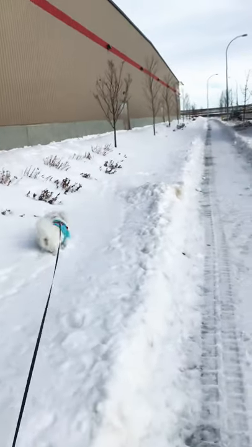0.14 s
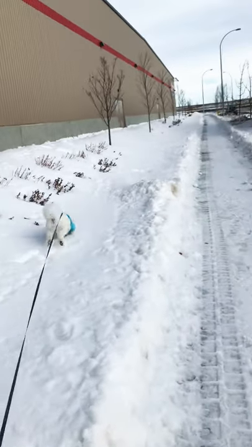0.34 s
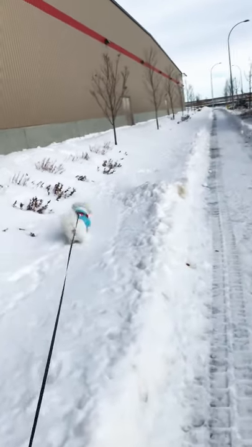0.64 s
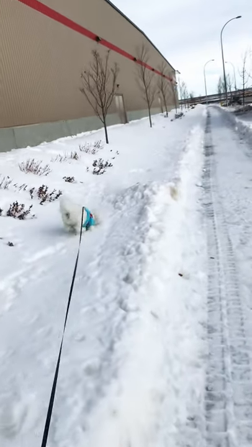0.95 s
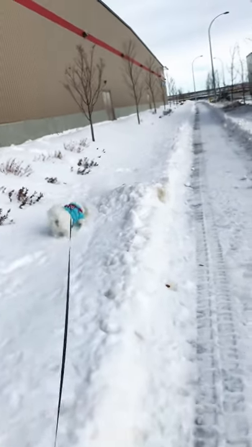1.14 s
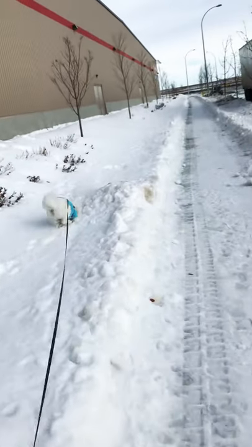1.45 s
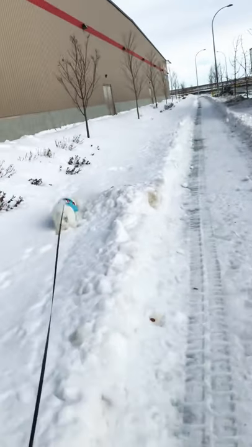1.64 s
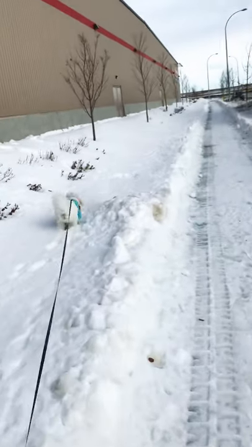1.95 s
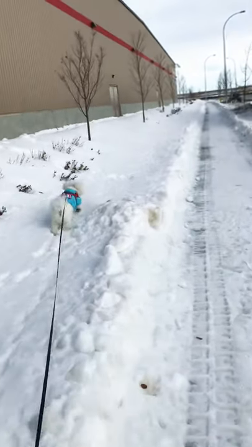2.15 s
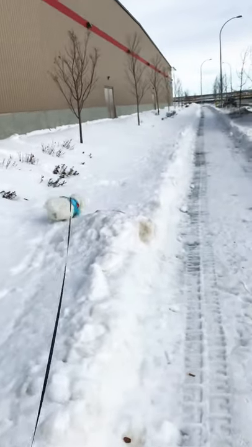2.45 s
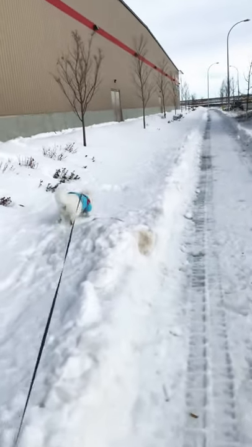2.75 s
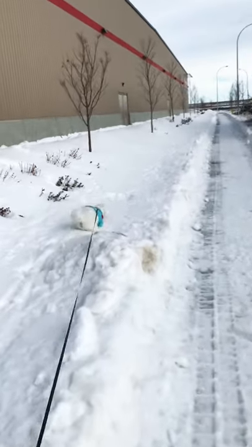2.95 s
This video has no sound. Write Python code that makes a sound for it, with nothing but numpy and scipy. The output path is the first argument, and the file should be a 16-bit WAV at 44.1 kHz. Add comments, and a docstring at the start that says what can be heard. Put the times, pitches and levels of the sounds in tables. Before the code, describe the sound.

Boots crunch softly through crusted snow at about two steps a second, with small icy snaps. Wind thumps and rumbles on the hand-held microphone throughout, over a faint hiss of clothing and a distant town hum.

```python
"""Wind thumps and rumbles on the microphone as boots crunch through crusted snow, two steps a second.
Outdoors, on a phone in the walker's hand. About a metre below it, each boot crushes a swarm of ice
grains and snaps bits of crust. Winter clothing hisses at arm's length, and a town hums far off."""
import sys
import numpy as np
from scipy import signal
from scipy.fft import rfft, irfft
from scipy.io import wavfile
from scipy.ndimage import uniform_filter1d

SR = 44100
rng = np.random.default_rng(int(sys.argv[2]) if len(sys.argv) > 2 else 0)


def unload_wav(signal):
    """Save mono or channel-first audio to the path in sys.argv[1] as 16-bit WAV at rate SR, clipped to [-1, 1]."""
    wavfile.write(
        sys.argv[1],
        SR,
        np.round(np.clip(np.atleast_2d(signal).T, -1, 1) * 32767).astype(np.int16),
    )


N = 136710
TIME_S = np.arange(N) / SR


def undb(db):
    """Decibels to gain."""
    return 10 ** (np.asarray(db) / 20)


def unit(x):
    """Scale to rms 1."""
    return x / np.sqrt(np.mean(x ** 2) + 1e-20)


def colour(x, points, tilt_db=0):
    """Causal filter through (freq_hz, gain_db) points, tilted by tilt_db per octave about 1.5 kHz."""
    hz, db = np.array(points).T
    octave = np.log2(np.maximum(np.fft.rfftfreq(2 * N, 1 / SR), 1))
    gain = undb(np.interp(octave, np.log2(hz), db) + tilt_db * (octave - np.log2(1500)))
    cepstrum = irfft(np.log(gain))[:N]
    cepstrum[1:] *= 2  # minimum phase: nothing rings ahead of a click
    return irfft(rfft(x, 2 * N) * np.exp(rfft(cepstrum, 2 * N)))[:N]


def band_noise(hz):
    """Noise two octaves wide around a centre, rms 1."""
    band = signal.butter(2, [hz / 2, min(hz * 2, SR / 2 - 100)], "band", fs=SR, output="sos")
    return unit(signal.sosfilt(band, rng.standard_normal(N)))


def wander(per_s):
    """Glide between random values, rms 1."""
    hold = int(SR / per_s)
    stairs = np.repeat(rng.standard_normal(N // 100), hold)[:N]
    return unit(uniform_filter1d(stairs, hold))


def clicks(per_s, spread_db):
    """Random clicks of uneven size, rms 1."""
    hits = (rng.random(N) < per_s / SR) * np.sign(rng.standard_normal(N))
    return unit(hits * undb(spread_db * np.minimum(rng.exponential(size=N), 4)))


def fade(age, decay_s):
    """Sudden start and exponential decay."""
    return (age >= 0) * np.exp(-np.abs(age) / decay_s)


def bell(centre_s, half_length_s):
    """A rounded rise and fall, peak 1."""
    return np.exp(-((TIME_S - centre_s) / half_length_s) ** 2)


def swells(rows):
    """Bells of gain from (centre_s, half_length_s, level_db) rows, added in power."""
    return np.sqrt(sum((undb(db) * bell(at, half)) ** 2 for at, half, db in rows))


# Spectrum of the town, far off: freq_hz, gain_db
TOWN_SPECTRUM = [(40, 8), (100, 4), (380, -6), (1100, -6), (1800, -12), (3200, -19.5), (5000, -30),
                 (15500, -54.5)]
def town_hum():
    """The distant town: a low, wavering wash of noise."""
    return unit(colour(rng.standard_normal(N), TOWN_SPECTRUM)) * undb(-51 + wander(14))


# Spectrum of the fabric hiss, at arm's length: freq_hz, gain_db
HISS_SPECTRUM = [(1200, -2.5), (3200, 7.5), (4800, 1.5), (9200, -0.5), (10400, -3.5), (11500, 2.5),
                 (15500, 6)]
# Rise and fall of that hiss: time_s, level_db
HISS_LEVELS = [(0, -53.5), (.22, -54), (.27, -57.5), (.52, -56), (.59, -51.5), (.74, -63.5), (.83, -53.5),
               (.98, -59.5), (1.07, -54), (1.42, -62.5), (1.95, -63.5), (2.02, -57), (2.18, -60),
               (2.42, -55), (2.57, -67), (2.73, -59.5), (3.1, -65)]
# Swishes of fabric: centre_s, half_length_s, level_db
SWISHES = [(1.28, 0.065, -58), (1.57, 0.033, -50), (1.81, 0.043, -60)]
def clothing():
    """Fabric hisses as the walker moves and now and then brushes with a lower swish."""
    hiss = unit(colour(rng.standard_normal(N), HISS_SPECTRUM))
    hiss_db = np.interp(TIME_S, *np.array(HISS_LEVELS).T) + 1.9 * wander(33.42)
    brush = unit(signal.lfilter(*signal.iirpeak(2980, Q=2.5, fs=SR), clicks(6000, spread_db=3)))
    return hiss * undb(hiss_db) + brush * swells(SWISHES)


# Puffs of wind, right on the microphone: centre_s, half_length_s, level_db
GUSTS = [(.255, 0.038, -27.5), (.475, 0.035, -24.5), (.56, 0.091, -29), (.74, 0.034, -37.5),
         (.83, 0.041, -30), (.94, 0.068, -33.5), (1.155, 0.059, -30), (1.39, 0.1, -31.5),
         (1.54, 0.043, -32), (1.69, 0.028, -33), (1.84, 0.11, -40.5), (2.24, 0.017, -30.5),
         (2.36, 0.26, -43), (2.58, 0.033, -30), (2.715, 0.1, -29.5)]
# Spectrum of their rumble: freq_hz, gain_db
RUMBLE_SPECTRUM = [(20, -34.5), (35, 0), (64, 4), (100, -3), (170, -12), (260, -29.5), (1500, -65)]
# Spectrum of the small eddies in strong gusts: freq_hz, gain_db
FLUTTER_SPECTRUM = [(80, -13.5), (200, 10), (420, -13), (700, -15), (2500, -96.5)]
def wind(breeze_db=-49.5, gustiness_db=3.5, flutter_db=-44.5):
    """Separate puffs rumble over a faint breeze; the strong ones add quicker, uneven flutter."""
    force = np.hypot(swells(GUSTS), undb(breeze_db + gustiness_db * wander(8.7)))
    rumble = unit(colour(rng.standard_normal(N), RUMBLE_SPECTRUM))
    rumble /= np.sqrt(uniform_filter1d(rumble ** 2, SR // 36))  # evened out, so force sets its level
    flutter = colour(rng.standard_normal(N), FLUTTER_SPECTRUM) * undb(2 * wander(50))
    return force * rumble + undb(flutter_db) * unit(flutter * force ** 1.5)


def swing(cycles, rise_cycles=0.36, fall_cycles=0.42):
    """One rounded push and pull of pressure that dies more slowly than it builds."""
    width = np.where(cycles < 0, rise_cycles, fall_cycles)
    return np.sin(2 * np.pi * cycles) / np.cosh(np.minimum(np.abs(cycles) / width, 20))


# Eddies that strike the microphone: centre_s, level_db, pitch_hz
EDDIES = [(.228, -16.5, 154.5), (0.249, -14.5, 307), (0.343, -15, 89), (0.433, -12, 234),
          (0.57, -21.5, 306), (0.78, -28.5, 237), (0.915, -23.5, 151), (1.111, -18.5, 99),
          (1.137, -18.5, 347), (1.196, -22, 104), (1.378, -16.5, 219), (1.393, -15.5, 190),
          (1.415, -14.5, 180), (1.464, -19.5, 128), (2.308, -18, 130.3), (2.3659, -19.5, 199),
          (2.704, -19.5, 129)]
def wind_thumps(puff_db=-10.5, puff_ratio=2.44, swirl_db=-13, swirl_cycles=2.6):
    """Each eddy is a swing of pressure with a quicker puff at its core and a little swirl around it."""
    out = np.zeros(N)
    for at, db, hz in EDDIES:
        near = np.abs(TIME_S - at) < 0.1
        cycles = (TIME_S[near] - at) * hz
        puff = undb(puff_db) * swing(puff_ratio * cycles)
        swirl = signal.sosfilt(signal.butter(4, 2 * hz, fs=SR, output="sos"), band_noise(hz))[near]
        swirl *= undb(swirl_db) * np.exp(-np.abs(cycles) / swirl_cycles)
        out[near] += undb(db) * (swing(cycles) + puff + swirl)
    return out


def snow_creak(pitch_hz=1100, level_db=-34):
    """Under the heaviest step, packed snow sticks and slips in jerks that ring one hollow resonance."""
    ring = signal.iirpeak(pitch_hz, Q=2, fs=SR)
    jerks = clicks(500, spread_db=1)
    creak = unit(signal.lfilter(*ring, signal.lfilter(*ring, jerks)))
    return undb(level_db) * creak * bell(centre_s=1.044, half_length_s=0.017)


def ice_grains(per_s_at_1khz):
    """Ice grains of many sizes, each ringing briefly at its own pitch; small ones are more numerous."""
    out = 0
    for hz in np.geomspace(300, 14000, 16):
        breaks = clicks(per_s_at_1khz * np.sqrt(hz / 1000), spread_db=4)
        out = out + signal.lfilter(*signal.iirpeak(hz, Q=4.5, fs=SR), breaks)
    return unit(out)


# Spectrum of breaking snow, heard from hand height: freq_hz, gain_db
CRUNCH_SPECTRUM = [(120, -23.5), (300, -2.5), (700, -1), (1150, -1.5), (1700, -9.5), (2400, -11.5),
                   (3400, -11.5), (4900, -17), (6000, -17.5), (10000, -29), (15500, -30)]
def crunch(grains, tilt_db=0):
    """Give grains the tone of snow underfoot, rms 1."""
    return unit(colour(grains, CRUNCH_SPECTRUM, tilt_db))


def pop(cycles, peak_cycles=0.66):
    """A dead pop of a cycle or two."""
    swell = np.maximum(cycles, 0) / peak_cycles
    return np.sin(2 * np.pi * cycles) * (swell * np.exp(1 - swell)) ** 3


# Snaps of crust and ticks of ice at the walker's feet: start_s, level_db, pitch_hz
SNAPS = [(0.08, -30, 3060), (.304, -28.5, 1850), (0.3434, -25.5, 2000), (.965, -28.5, 2555),
         (1.0113, -30, 1130), (1.034, -27, 1170), (1.074, -20.5, 1180), (1.332, -28, 1040),
         (1.529, -38.5, 5640), (1.5656, -26.5, 2900), (1.572, -26.5, 750), (1.639, -31, 760),
         (1.7291, -35.5, 11880), (2.071, -27.5, 1263), (2.107, -18.5, 760), (2.146, -25, 1180),
         (2.1646, -28.5, 1370), (2.183, -34, 1250), (2.2052, -21.5, 1160), (2.2907, -27, 1150),
         (2.512, -34, 3600), (2.7031, -22.5, 930), (2.7191, -30, 3400), (2.7997, -34, 1150),
         (2.8382, -31, 1360), (2.8659, -33, 2430), (2.8913, -28.5, 1160), (2.9273, -30.5, 1400)]
def crust_snaps(recrack_s=0.0034, recrack_ratio=0.77):
    """Crust gives way: a pop with a rough edge, a weaker, lower second crack and a brief shatter."""
    out, age = np.zeros(2 * N), np.arange(SR // 20) / SR
    shards = crunch(ice_grains(300), tilt_db=-3)
    delays = recrack_s * (0.5 + rng.random(len(SNAPS)))
    for (start, db, hz), delay in zip(SNAPS, delays):
        span = int(start * SR) + np.arange(len(age))
        recrack = undb(-7.5) * pop((age - delay) * hz * recrack_ratio)
        edge = undb(-13.5) * band_noise(2 * hz)[span] * fade(age, decay_s=0.00089)
        shatter = undb(-9) * shards[span] * fade(age, decay_s=0.0037)
        onset = np.minimum(age * hz, 1)
        out[span] += undb(db) * (pop(age * hz) + recrack + onset * (edge + shatter))
    return out[:N]


# Boot presses, scrapes and brief collapses of snow, about a metre below the microphone:
# start_s, length_s, level_db, tilt_db_per_octave
PRESSES = [(0.458, 0.042, -39, -1.5), (0.913, 0.012, -39.5, 1.5), (0.924, 0.086, -51, 3),
           (1.004, 0.05, -42, -1), (1.032, 0.012, -36, 0), (1.544, 0.095, -45, -2.5),
           (2.066, 0.095, -42, -0.5), (2.642, 0.042, -56, 1.5), (2.691, 0.065, -43.5, -0.5)]
def footsteps(clump_db=3.2, tick_db=-67):
    """Grains break in clumps as the weight comes on; crumbs settle afterwards and tick between steps."""
    snow = ice_grains(300) * undb(clump_db * wander(220))
    crumbs = ice_grains(50)
    out = undb(tick_db) * crunch(clicks(22, spread_db=2))
    for start, length, db, tilt in PRESSES:
        age = TIME_S - start
        weight = np.interp(age / length, [0, 0.5, 1], [0.3, 1, 0.25], left=0, right=0)
        share = np.sqrt(length * SR / N)  # makes the level count over this press's own length
        crush = share * unit(weight * snow)
        settle = undb(-9.5) * fade(age - length / 2, decay_s=0.047) * crumbs
        out += undb(db) * share * crunch(crush + settle, tilt)
    return out


def scene():
    """Boots, wind, clothing and town at one hand-held microphone."""
    boots = footsteps() + snow_creak() + crust_snaps()
    return (boots + wind() + wind_thumps() + clothing() + town_hum())[None]


def record(dry, bottom_hz=28, top_hz=15850):
    """The phone cuts the deepest bass and the top."""
    thin = signal.sosfilt(signal.butter(2, bottom_hz, "high", fs=SR, output="sos"), dry)
    return signal.sosfilt(signal.ellip(10, 0.2, 80, top_hz, fs=SR, output="sos"), thin)


dry = scene()
out = record(dry)
unload_wav(out)
```